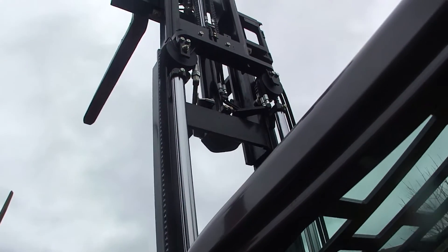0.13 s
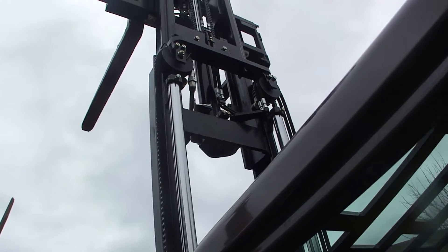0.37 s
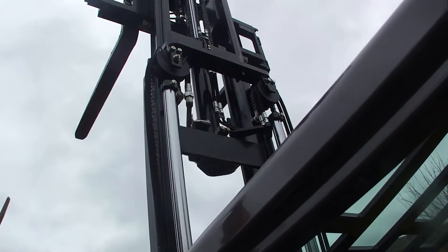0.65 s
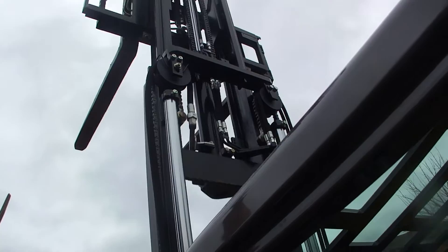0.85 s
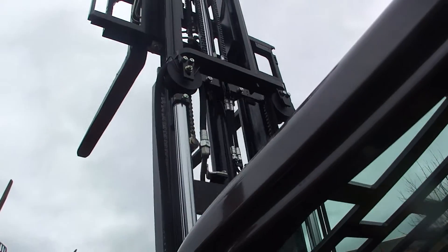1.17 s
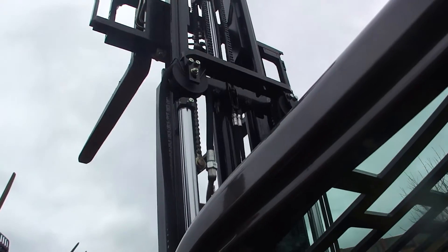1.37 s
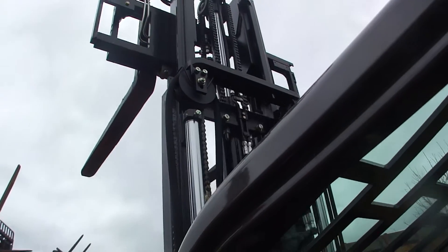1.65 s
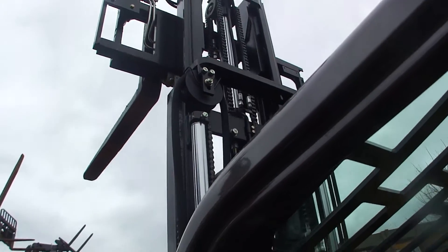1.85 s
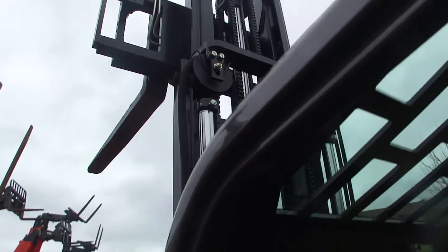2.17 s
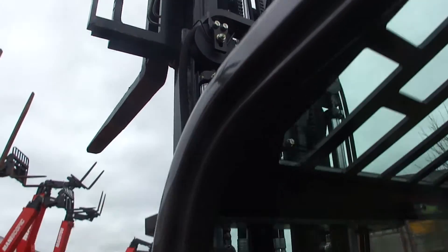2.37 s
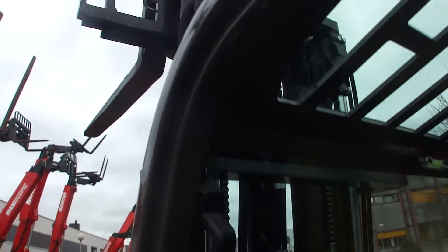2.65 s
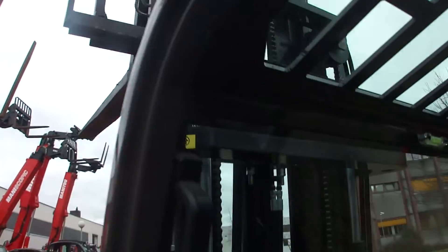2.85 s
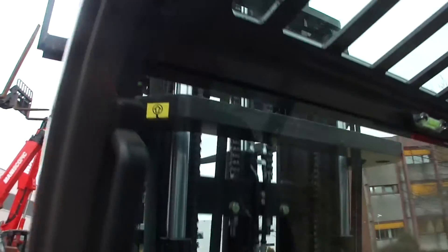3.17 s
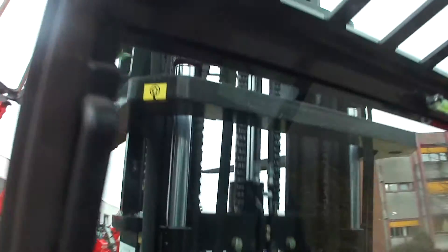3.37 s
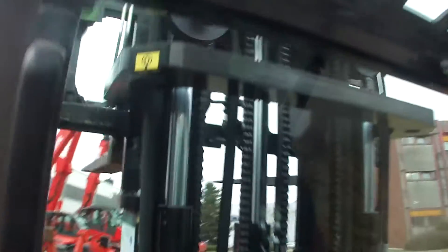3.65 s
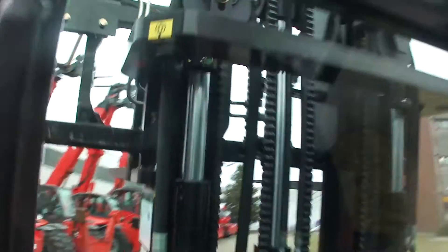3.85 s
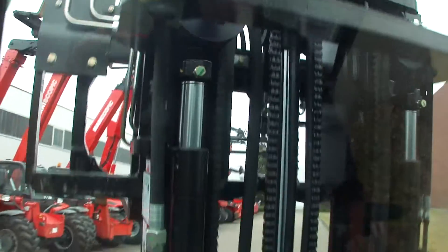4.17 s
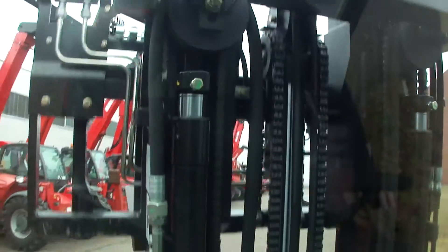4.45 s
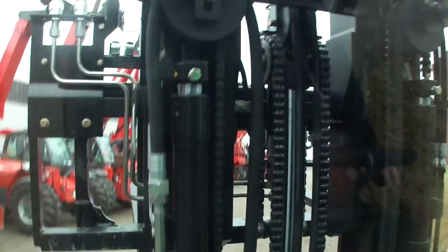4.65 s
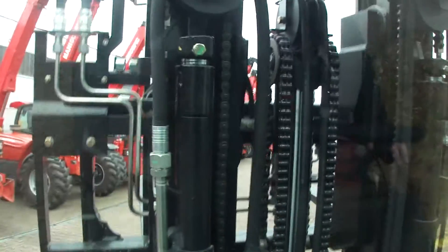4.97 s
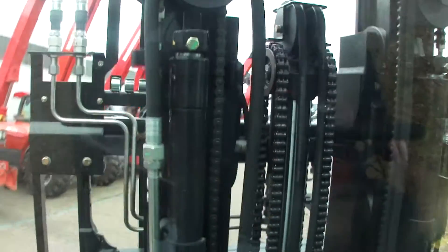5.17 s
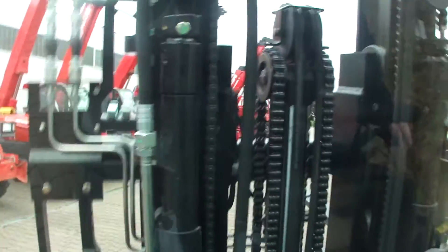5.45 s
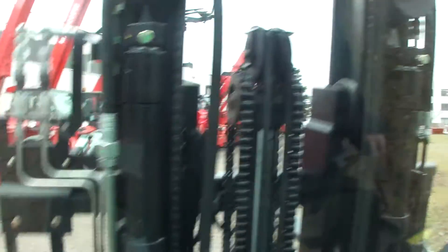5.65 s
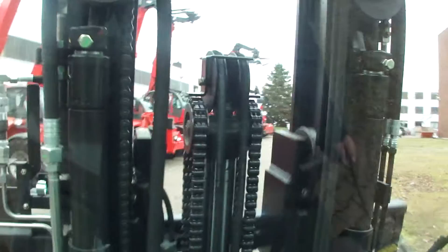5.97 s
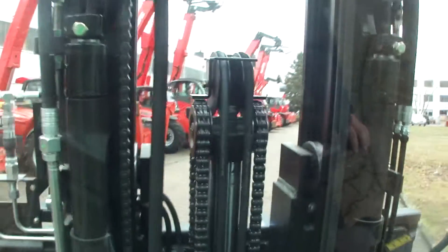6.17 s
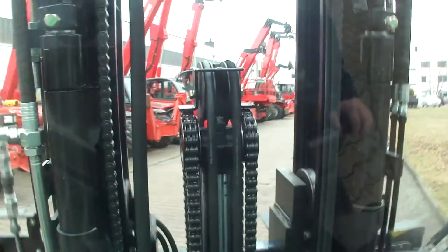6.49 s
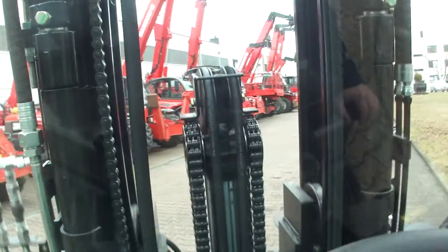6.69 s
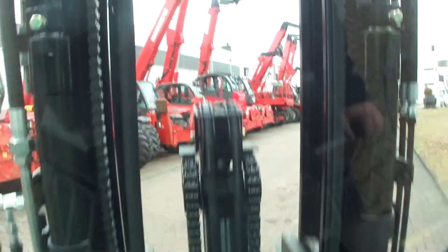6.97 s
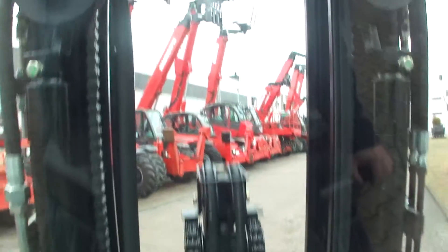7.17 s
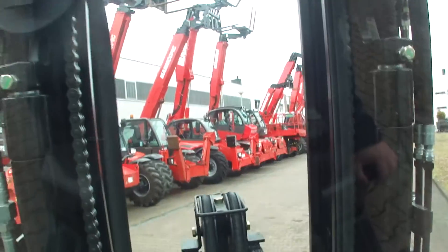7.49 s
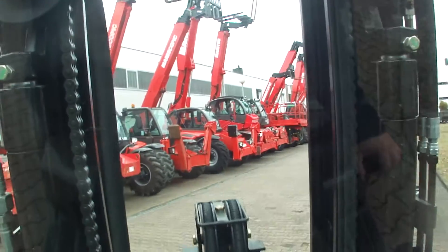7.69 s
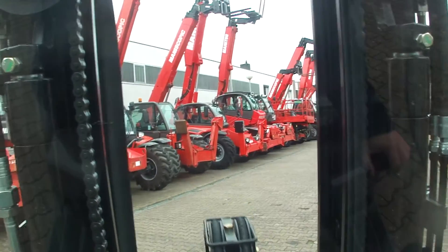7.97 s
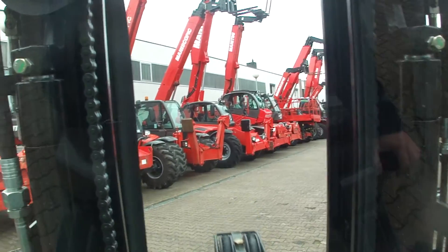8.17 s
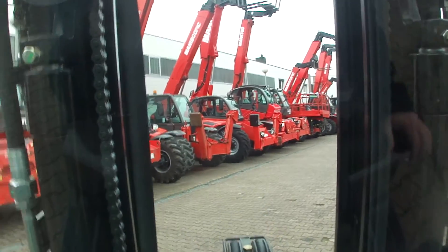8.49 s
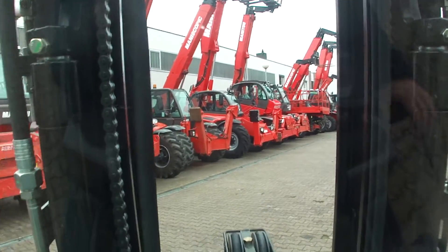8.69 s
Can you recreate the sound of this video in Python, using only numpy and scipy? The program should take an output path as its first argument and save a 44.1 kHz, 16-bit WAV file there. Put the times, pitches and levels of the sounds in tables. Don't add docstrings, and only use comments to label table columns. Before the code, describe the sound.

A handheld stereo microphone in a vehicle cab catches a four-cylinder diesel: short rough idle, then a dense working drone with whining pump, clattering valves and airy hiss as the mast sinks. Around the middle the engine falls and surges again, with low handling thumps and an overloaded click on the right, which stays dull afterwards. Late chain taps ring out before the revs rise strongly.

```python
import sys
import numpy as np
from scipy import signal
from scipy.fft import rfft, irfft
from scipy.io import wavfile
from scipy.ndimage import uniform_filter1d

SR = 44100
rng = np.random.default_rng(int(sys.argv[2]) if len(sys.argv) > 2 else 0)


def volts_from_decibels(level):
    exponent = np.asarray(level, float) / 20
    return 10 ** exponent


def generate_wav(sig):
    pcm = np.round(np.clip(np.atleast_2d(sig).T, -1, 1) * 32767).astype(np.int16)
    wavfile.write(sys.argv[1], SR, pcm)


N = 389399
T = np.arange(N) / SR

# mast nearing from and to [s], then camera turning from and to [s].
STAGES = (2.5, 3.2, 5, 5.4)


def curves(table):
    s, *columns = np.transpose(table)
    return [np.interp(T, s, c) for c in columns]


def ramp(start, end, t=T):
    return np.clip((t - start) / (end - start), 0, 1)


def bump(x, centre, width, db):
    return db * np.exp(-((x - centre) / width) ** 2)


def unit(x):
    return x / np.sqrt(np.mean(x ** 2))


def band(x, lo_hz, hi_hz, order=2):
    return signal.sosfilt(signal.butter(order, [lo_hz, hi_hz], "band", fs=SR, output="sos"), x)


def ring(x, modes):
    out = 0
    for k, (hz, width, db) in enumerate(modes):
        b, a = signal.iirpeak(hz, hz / width, SR)
        out = out + (-1) ** k * volts_from_decibels(db) * signal.lfilter(b, a, x)
    return out


def colour(x, points, size=4096):
    hz, db = np.transpose(points)
    bin_hz = np.arange(size // 2 + 1) * SR / size
    cepstrum = irfft(np.interp(np.log(bin_hz + 1), np.log(hz), db) * np.log(10) / 20)
    cepstrum[1:size // 2] *= 2
    cepstrum[size // 2 + 1:] = 0
    return signal.fftconvolve(x, irfft(np.exp(rfft(cepstrum))))[:N]


def clicks(seconds, sizes):
    place = np.clip(np.ravel(seconds) * SR, 0, N - 2)
    i = place.astype(int)
    first = np.bincount(i, np.ravel(sizes) * (1 + i - place), N)
    return first + np.bincount(i + 1, np.ravel(sizes) * (place - i), N)


def walk(rate, t=T):
    count = int(N / SR * rate) + 2
    return 1.305 * np.interp(t, np.arange(count) / rate, rng.standard_normal(count))


def load_states(t):
    wakes_s, coasts_s, pulls_s = 1.097, 4.72, 5.24
    idle = 1 - ramp(wakes_s - .08, wakes_s + 0.049, t)
    coast = ramp(coasts_s, coasts_s + 0.065, t) - ramp(pulls_s - .06, pulls_s, t)
    return idle, coast, ramp(*STAGES[2:], t)


def partial(multiple, db, firings, t):
    level = np.interp(T, t, 2 ** .5 * volts_from_decibels(db + 1.0 * walk(6, t)))
    turns = multiple * firings + rng.random()
    if multiple > 7:
        turns = turns + .05 * np.interp(T, t, walk(9, t))
    return level * np.sin(2 * np.pi * turns)


def whines(firings, hz):
    multiples = (1, 2, 4.39, 6, 12, 24)
    # level in dB at working speed, dB per octave of speed, dB added as the mast nears,
    # dB while coasting, dB once the camera has turned.
    levels = [(-55.5, 27.5, 3, -4, -3), (-45.5, 10.5, 0, 2, 7.5), (-32, 3, 2.5, -10, 2.5),
              (-26, 4, 2, -3.5, 2), (-34, 0, -9, -9, 4.5), (-46, 1.5, 1.5, 5.5, 0.77)]
    at_idle = (3, -5, -0.5, -23.5, 0.3, 0.5)
    in_rev = (0, 0, -1, 3, -9, 0)
    at_top = (2, 0, 1, 4, -5, 0)
    # frequency in Hz, width in Hz, level in dB.
    panels = [(97.4, 15.4, 5), (413.4, 42, -11), (604.4, 35, 9.5), (1358, 27.8, 9.5)]
    # centre in seconds, length in seconds, level in dB.
    pump_gaps = [(1.6, .3, -8), (2.92, .2, -9), (4.05, .12, -5)]
    t, hz = T[::64], hz[::64]
    near = ramp(*STAGES[:2], t)
    idle, coast, turned = load_states(t)
    out = 0
    for k, idle_db, rev_db, top_db, row in zip(multiples, at_idle, in_rev, at_top, levels):
        db, slope, near_db, coast_db, turned_db = row
        db = db + slope * np.log2(hz / 57)
        db = db + near_db * near + coast_db * coast + turned_db * turned + idle_db * idle
        db = db + rev_db * ramp(7.62, 7.76, t) + top_db * ramp(8.3, 8.35, t)
        db = db + sum(bump(k * hz, *panel) for panel in panels)
        db = db + turned * bump(k * hz, 116.89, 5.1, -13.5)
        if k == 2:
            db = db + bump(t, 5.27, 0.082, 20.1)
        if k == 4.39:
            db = db + 1.2 * walk(2.9, t) - 8 * ramp(8.5, 8.62, t) + bump(t, 5.55, .25, -4)
        if k == 6:
            db = db - 3.5 * ramp(6.65, 6.85, t)
        if k == 12:
            db = db + 3.5 * ramp(5.78, 6.99, t)
        if k == 24:
            db = db + sum(bump(t, *gap) for gap in pump_gaps)
        out = out + partial(k, db, firings, t)
    return out


def fine_lines(firings, hz):
    orders = (12, 16, 20, 35.1, 36, 37, 38, 39, 40, 42, 43, 43.9, 45, 46, 49, 52, 53, 54, 55, 56, 57, 60,
              61, 64, 68, 69, 70, 72, 76, 80, 86, 88, 92, 104, 109, 120, 124, 128, 144, 156, 166.3, 240)
    # level in dB as revs settle, as the high mast sinks, as it nears the cab,
    # once the camera has turned, in the next rev.
    levels = [(-40, -44, -41, -36, -34), (-47, -44, -46, -43, -42), (-41, -42, -41, -42, -36),
              (-34, -29, -33, -38, -48), (-41, -36, -39, -48, -35), (-54, -56, -42, -48, -43),
              (-35, -38, -36, -43, -40), (-34, -31, -31, -57, -50), (-43, -39, -33, -39, -31),
              (-29, -29, -38, -38, -29), (-29, -44, -44, -45, -42), (-33, -31, -36, -46, -34),
              (-43, -48, -48, -53, -40), (-35, -38, -40, -38, -39), (-55, -41, -47, -58, -39),
              (-40, -39, -37, -42, -43), (-40, -35, -53, -54, -40), (-44, -48, -41, -46, -35),
              (-36, -39, -44, -41, -41), (-34, -35, -38, -44, -50), (-35, -56, -45, -47, -49),
              (-43, -42, -39, -55, -42), (-47, -45, -36, -42, -56), (-38, -40, -48, -47, -65),
              (-57, -46, -47, -40, -48), (-47, -44, -58, -38, -46), (-47, -59, -46, -40, -57),
              (-45, -38, -44, -37, -60), (-60, -46, -38, -43, -48), (-49, -53, -41, -51, -61),
              (-63, -60, -56, -47, -51), (-52, -52, -48, -49, -42), (-54, -53, -46, -55, -48),
              (-51, -52, -48, -48, -48), (-64, -57, -53, -45, -68), (-47, -53, -50, -53, -51),
              (-63, -52, -49, -57, -48), (-54, -51, -53, -61, -68), (-55, -58, -51, -47, -51),
              (-72, -64, -73, -51, -65), (-66, -62, -58, -70, -70), (-78, -74, -72, -80, -80)]
    loads = (2.0, 2.25, 2.9, 3.2, 5, 5.4, 7.65, 7.8)
    # frequency in Hz, width in Hz, level in dB.
    live_panels = [(615, 47, 3.5), (785.4, 35, 5.5)]
    # frequency in Hz, width in Hz, level in dB.
    favoured = [(517, 69, -0.5), (627, 23.8, 1), (790, 25, 0.5)]
    t, hz = T[::64], hz[::64]
    idle, coast, turned = load_states(t)
    speed_db = -140 * np.abs(np.log10(hz / np.clip(hz, 54 - 4 * turned, 60)))
    last_rev_db = -4 * (ramp(7.6, 7.8, t) + ramp(8.2, 8.35, t))
    settle_db = -2 * (1 - ramp(1.3, 1.9, t)) * (1 - idle)
    out = 0
    for k, levels_db in zip(orders, levels):
        line_hz = k / 4 * hz
        db = np.interp(t, loads, np.repeat(levels_db, 2)[1:-1])
        if k > 30:
            db = db + speed_db
            for at_hz, width, gain in live_panels:
                db = db + bump(line_hz, at_hz, width, np.minimum(-speed_db, 1) * gain - speed_db)
        else:
            db = db - 5 * coast
        if k == 36:
            db = db + idle * (7.5 - speed_db)
        db = db + last_rev_db + settle_db + 1.5 * walk(4, t)
        db = db + sum(bump(line_hz, *peak) for peak in favoured)
        out = out + partial(k / 4, db, firings, t)
    return out


def clatter(firings, count=120, repeat_db=-9, gate=0.126):
    turns = np.arange(int(firings[-1] / 4) + 1)[:, None]
    place, size = rng.random(count), rng.standard_normal(count)
    loose = rng.standard_normal((200, count, 2))[:len(turns)]
    when = np.interp(4 * (turns + place), firings, T) + .0001 * loose[..., 0]
    strikes = unit(clicks(when, size * volts_from_decibels(5.53 * loose[..., 1])))
    air = rng.standard_normal(N) * (1 + gate * np.cos(2 * np.pi * firings))
    return unit(air) + volts_from_decibels(repeat_db) * strikes


def knock(firings):
    # time in seconds, peak in dB.
    accents = [(0.042, -7), (0.129, -7.5), (0.222, -6.5), (0.317, -9.5), (0.413, -9.5), (0.508, -11.5),
               (0.599, -17), (0.698, -12), (0.793, -11), (0.885, -8), (0.976, -8), (1.059, -5),
               (1.137, -7.5), (1.211, -7.5), (1.284, -8), (1.357, -4.5), (1.43, -3.5), (1.503, -4),
               (1.574, -9.5), (1.647, -6.5), (1.72, -7), (1.792, -6), (1.864, -5.5), (1.935, -5),
               (2.006, -5), (2.076, -8), (2.147, -10), (2.217, -6), (2.288, -7), (2.359, -3), (2.429, -10),
               (2.499, -9.5), (2.569, -3)]
    # frequency in Hz, width in Hz, level in dB.
    low_ring = [(590, 60, 0), (790, 90, -11), (560, 200, -11)]
    # frequency in Hz, width in Hz, level in dB.
    high_ring = [(859, 84, 9.5), (1076, 60, -13)]
    at = 4 * np.arange(int(firings[-1] / 4)) + 2 - .12
    when = np.interp(at, firings, T)
    s, peak_db = np.transpose(accents)
    accent_db = .8 * (np.interp(when, s, peak_db) + 8)
    random_db = 2.5 * rng.standard_normal(200)[:len(at)]
    blow = band(clicks(when, volts_from_decibels(np.where(when < s[-1], accent_db, random_db))), 350, 1100)
    hum = .45 * unit(band(rng.standard_normal(N), 570, 635)) * volts_from_decibels(-7 * (ramp(.15, .22) - ramp(1, 1.15)))
    low_db = -26.5 - 0.89 * np.minimum(T, 5) - 14.5 * ramp(2.5, 4.5) + 4 * ramp(7.9, 8.1)
    low_db = low_db + 3.5 * (ramp(.15, 0.32) - ramp(0.86, 1.08))
    lean_s, back_s = 8.5, 8
    high_db = -41.5 + 9.5 * (ramp(lean_s, lean_s + 0.31) - .8 * ramp(back_s - .6, back_s))
    return volts_from_decibels(low_db) * (unit(ring(blow, low_ring)) + hum) + volts_from_decibels(high_db) * unit(ring(blow, high_ring))


def cab(drive, covered):
    # frequency in Hz, gain in dB.
    response = [(40, -37.5), (90, -21.5), (140, -13.5), (175, 0.5), (300, 2.5), (430, -3), (600, -4.5),
                (1000, -6.5), (1900, -12), (2300, -19), (3000, -33.5), (4300, -38.5), (5800, -30),
                (9000, -29.5), (11200, -40.5)]
    # time in seconds, effort in dB.
    engine = [(0, 2), (.25, 0), (.8, 0), (1.05, 2), (1.5, -0.5), (2.0, 0.5), (3.75, 0), (4.5, 0.5),
              (4.92, -3), (4.96, -3), (5.14, -3.5), (5.22, 3), (5.36, -0.5), (5.5, -1), (6.0, 0.5),
              (7.25, 0.5), (8.5, 3.5), (8.83, 1)]
    # time in seconds, flow in dB.
    oil = [
        (0, 0),
        (3.5, 0),
        (4.0, 3.5),
        (4.5, 2.5),
        (4.75, 2),
        (5.75, 1.5),
        (7.0, 1.5),
        (8.83, -0.5),
    ]
    x = colour(drive, response)
    (effort,), (flow,) = curves(engine), curves(oil)
    drone_db = -18.5 + 1.34 * effort - 0.0531 * flow + 2 * covered
    clatter_db = -27 + 0.64 * effort + .5 * flow - 0.5 * covered
    hiss_db = -44 + 1.16 * effort + 1.36 * flow + 0.01 * covered
    step_db = -2.5 * (ramp(0.155, 0.24) - ramp(0.95, 0.94))
    boom = unit(band(x, 28.5, 334.0)) * volts_from_decibels(drone_db - 8.5 + 2.26 * covered + 0.456 * walk(7.2))
    drone = unit(band(x, 385.2, 857)) * volts_from_decibels(drone_db - 9.5 - 3.68 * covered + step_db + 0.71 * walk(11))
    rattle = unit(band(x, 676, 3650.0)) * volts_from_decibels(clatter_db - 1.58 + 0.7 * walk(10))
    air = rng.standard_normal(N) * volts_from_decibels(.8 * walk(40) + .5 * walk(5))
    hiss = unit(band(colour(air, response), 2892.0, 16800)) * volts_from_decibels(hiss_db)
    return boom - drone + rattle, hiss


def microphone(x):
    # frequency in Hz, width in Hz.
    notches = [(3000, 256), (4000, 312), (5020, 490)]
    for hz, width in notches:
        b, a = signal.iirnotch(hz, hz / width, SR)
        x = signal.lfilter(b, a, signal.lfilter(b, a, x))
    return signal.sosfilt(signal.cheby2(8, 37, 11950, fs=SR, output="sos"), x)


def mast_rattles():
    # start in seconds, level in dB, ring in seconds, share of heavy parts in dB.
    hits = [
        (.577, -24, .09, 26),
        (.876, -33, .03, -40),
        (1.062, -30, .03, -40),
        (1.734, -30, .02, -40),
        (1.889, -20, .02, -30),
        (7.084, -25, .02, -40),
        (7.13, -16, .04, -40),
        (7.377, -13, .1, -30),
        (8.039, -23, .04, -40),
    ]
    # frequency in Hz, width in Hz, level in dB.
    modes = [(1130, 120, -9), (1590, 100, -5), (1850, 120, -4), (760, 250, -10), (3000, 1800, -12),
             (6000, 900, -13), (8800, 2500, -10)]
    # time in seconds, level in dB, pitch in Hz.
    squeal = [
        (.3, -67, 6200),
        (.37, -44.5, 6400),
        (.4, -44, 6600),
        (.43, -44.5, 6900),
        (.46, -49.5, 6900),
        (.52, -59.5, 6700),
    ]
    light, heavy, tail = np.zeros(N), np.zeros(N), T[:SR // 5]
    for s, db, ring_s, heavy_db in hits:
        burst = volts_from_decibels(db) * rng.standard_normal(len(tail)) * np.exp(-np.log(1000) * tail / ring_s)
        light[int(s * SR):][:len(tail)] += burst
        heavy[int(s * SR):][:len(tail)] += 4 * volts_from_decibels(heavy_db) * burst
    steel = band(ring(heavy, modes[:4]), 450, 2400) + ring(light, modes[4:])
    squeak_db, hz = curves(squeal)
    wobble = uniform_filter1d(rng.standard_normal((2, N)), int(SR / 1200), axis=1)
    phase = 2 * np.pi * np.cumsum(hz) / SR
    squeak = unit(wobble[0] * np.cos(phase) + wobble[1] * np.sin(phase))
    return steel + volts_from_decibels(squeak_db + 2.0 * walk(60)) * squeak


def limiter(x):
    # time in seconds, left spike in dB, right spike in dB, sign of the right, duck in dB.
    overloads = [(.5809, -10, -9, 1, -3), (1.2855, -24, -22, 1, -2), (1.432, -23, -21, 1, -2),
                 (5.297, -60, -2, -1, -17), (5.2971, -6, -60, 1, 0), (5.2977, -60, -5, 1, 0),
                 (5.2995, -60, -7, 1, 0), (5.379, -28, -22, -1, 0), (5.385, -26, -20, -1, 0),
                 (8.485, -19, -28, -1, 0), (8.497, -18, -26, -1, -8)]
    for s, left_db, right_db, sign, duck_db in overloads:
        recover_s = .009 - .0009 * duck_db
        near = slice(int((s - .01) * SR), int((s + .1) * SR))
        late = T[near] - s
        spike = np.exp(-np.abs(late) / .00012) - .35 * np.exp(-((late - .0005) / .0004) ** 2)
        duck = volts_from_decibels(duck_db * np.clip((late - .003) / .002, 0, 1) * np.exp(-(late / recover_s) ** 2))
        x[:, near] = x[:, near] * duck + spike * np.array([[volts_from_decibels(left_db)], [sign * volts_from_decibels(right_db)]])
    return np.clip(x, -.95, .95)


def shaken_panels():
    # frequency in Hz, width in Hz, level in dB.
    shaken = [(572, 34, 0), (654, 30.6, -4), (785, 36, -2.5), (940, 36, -8.5)]
    start, end = 4.56, 5.03
    hum = 0
    for hz, width, db in shaken:
        hum = hum + volts_from_decibels(db + 4 * walk(9)) * unit(ring(rng.standard_normal(N), [(hz, width, 0)]))
    return volts_from_decibels(-34) * hum * (ramp(start, start + 0.06927) - ramp(end - .05, end))


def rub(rub_db):
    grains = rng.standard_normal(N) * volts_from_decibels(2.1 * walk(60))
    return volts_from_decibels(rub_db) * unit(band(band(grains, 71, 517, order=1), 64.5, 1654.0, order=3))


def finger_ticks():
    # time in seconds, level in dB.
    ticks = [(5.208, -34), (5.26, -32), (5.272, -34), (5.87, -40), (6.1235, -38), (6.247, -40),
             (6.326, -37), (6.543, -36), (7.35, -38), (7.60, -41), (7.6445, -37), (8.09, -40), (8.44, -38),
             (8.706, -41)]
    s, db = np.transpose(ticks)
    return clicks(s, volts_from_decibels(db)) * np.array([[.25], [.6]])


def scene():
    # time in seconds, firing rate in Hz.
    speed = [(0, 48.66), (.2, 41.61), (.76, 42.11), (.98, 45.22), (1.13, 54.08), (1.5, 55.13), (2.2, 57.01),
             (3.0, 57.38), (4.57, 57.62), (4.78, 42.12), (5.02, 31.94), (5.15, 30.13), (5.39, 51.15),
             (7.63, 50.78), (7.81, 58.33), (8.28, 58.52), (8.6, 72.59), (8.83, 73.75)]
    # time in seconds, skin rub in dB.
    skin_drag = [
        (0, -47.5),
        (4.75, -34),
        (5.0, -32.5),
        (5.07, -24),
        (5.29, -14.5),
        (5.4, -29.5),
        (5.78, -30.5),
        (6.0, -21.5),
        (6.75, -34.5),
        (8.83, -33),
    ]
    hz, = curves(speed)
    firings = np.cumsum(hz) / SR
    covered, (rub_db,) = ramp(4.985, 5.18), curves(skin_drag)
    opening = 1 - covered * (1 - 0.07 * ramp(5.26, 5.37))
    right_hiss_db = covered * (-17.5 + 0.57 * (rub_db + 30.5))
    body, hiss = cab(clatter(firings), 1 - opening)
    other_body, other_hiss = cab(rng.standard_normal(N), 1 - opening)
    heard = body + whines(firings, hz) + fine_lines(firings, hz) + knock(firings) + shaken_panels()
    hits, skin = mast_rattles(), rub(rub_db - 1)
    cross = 0.2058
    share = (opening - cross) / (1 - cross * opening)
    apart = volts_from_decibels(-9.0) * band(other_body, 794, 2950, order=1)
    apart = apart + volts_from_decibels(-10.5) * band(other_body, 110, 6000, order=1)
    leak = 0.38 * (1 - opening) * band(heard, 22.4, 180.0)
    right = volts_from_decibels(1.3633) * (share * (heard + hits) + leak + (0.126 + 0.675 * opening) * apart) + skin
    right += volts_from_decibels(right_hiss_db + 1.04) * (0.072 * np.sign(share) * hiss + 1.075 * other_hiss)
    return np.array([heard + hits + hiss - cross * skin, right])


def top_cut(x):
    return signal.sosfilt(signal.butter(12, 14083, fs=SR, output="sos"), x)


def record(dry):
    x = limiter(microphone(dry) + finger_ticks())
    return top_cut(x)


dry = scene()
out = record(dry)
generate_wav(out)
```